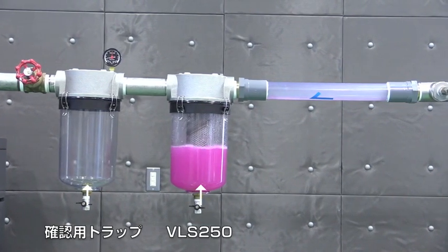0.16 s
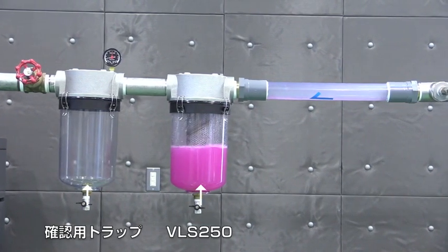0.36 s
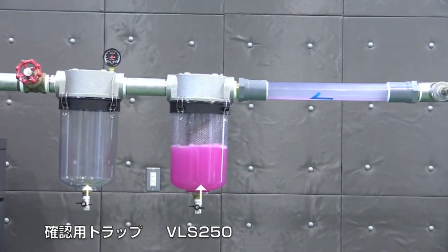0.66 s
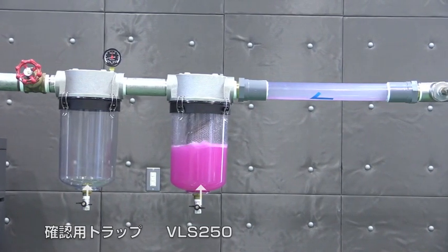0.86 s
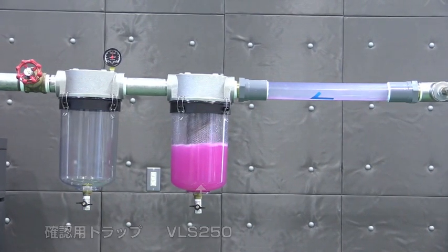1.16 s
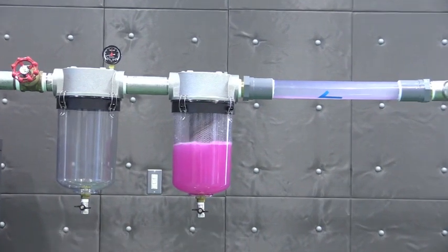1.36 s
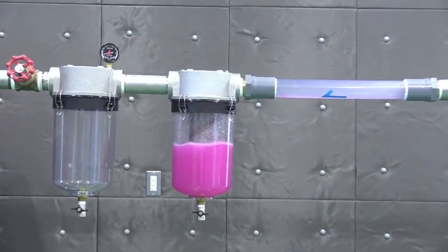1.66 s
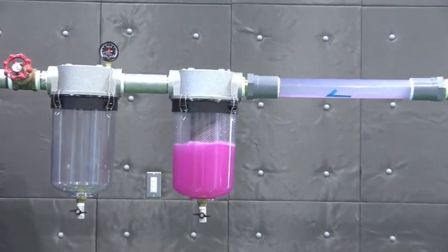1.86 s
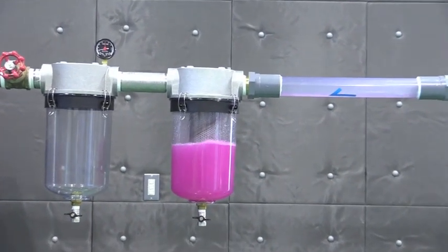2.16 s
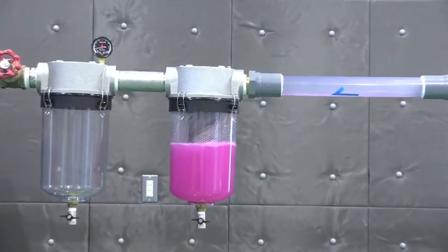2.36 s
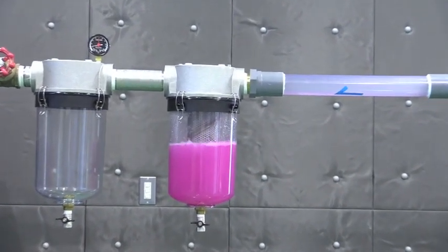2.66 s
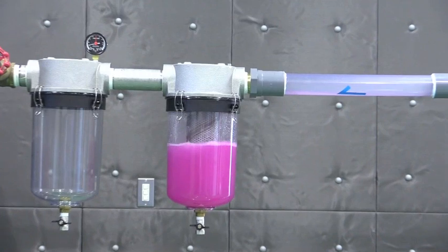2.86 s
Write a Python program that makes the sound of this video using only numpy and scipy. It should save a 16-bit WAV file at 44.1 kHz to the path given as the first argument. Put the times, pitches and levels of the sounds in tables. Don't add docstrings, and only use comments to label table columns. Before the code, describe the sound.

Two vacuum pumps drone throughout, a deep hum strongest near 117 and 234 Hz, beating very slowly over rumbling casings. Air rushes steadily through pipes with a mid-high hiss and faint fitting whistles. A thin valve whistle near 2.3 kHz swells around 0.15, 0.9 and, loudest, 2.15 seconds, rising again near 2.9. At about 1.33 seconds everything quickly fades to silence and back. Close stereo, dry padded room.

```python
import sys
import numpy as np
from scipy import signal
from scipy.io import wavfile
from scipy.ndimage import uniform_filter1d

SR = 44100
rng = np.random.default_rng(int(sys.argv[2]) if len(sys.argv) > 2 else 0)


def log_audio(samples):
    frames = np.atleast_2d(samples).T
    limited = np.clip(frames, -1, 1)
    pcm = np.round(limited * 32767).astype(np.int16)
    wavfile.write(sys.argv[1], SR, pcm)


def amplitude_ratio(level_db):
    exponent = np.asarray(level_db, float) / 20
    return 10 ** exponent


N = 133182
CUT_S = 1.328
SIDES = np.array([[.5], [-.5]])


def evened(x):
    return x / np.sqrt(np.mean(abs(x) ** 2) + 1e-20)


def read(points, hz):
    f, value = np.transpose(points)
    return np.interp(np.log(hz + 1), np.log(f + 1), value)


def drift(rate_hz):
    t = np.arange(N // 64 + 2) * 64 / SR
    rates_hz = np.geomspace(.3, 1, 16) * rate_hz
    slow = sum(np.sin(2 * np.pi * (f * t + rng.random())) / np.sqrt(f) for f in rates_hz)
    return np.interp(np.arange(N) / SR, t, evened(slow))


def fuzzy(hz, width_hz):
    pole = np.exp(-np.pi * width_hz * 32 / SR)
    a, b = rng.standard_normal((2, N // 32 + 400))
    slow = signal.lfilter([1], np.convolve([1, -pole], [1, -pole]), a + 1j * b)
    slow = evened(slow[300:])
    smooth = uniform_filter1d(np.repeat(slow, 32), size=32)[:N]
    carrier = np.exp(2j * np.pi * hz * np.arange(N) / SR)
    return np.sqrt(2) * (smooth * carrier).real


def ports(db, pan_db):
    return amplitude_ratio(db + SIDES * pan_db)


# f/Hz, lead/rad
PORT_LEAD = [(120, 0.23), (300, 0.11), (950, 0.34), (1900, 0.68), (3100, 0.54), (4800, -1.36), (6200, 0.08),
             (12000, -0.39)]


def pump(shaft_hz, orders, levels, pipe_leads):
    t = np.arange(N) / SR
    skipped_s = .62 * (t > CUT_S)
    turns = shaft_hz * (t + skipped_s) + .002 * drift(rate_hz=2.955)
    out = np.zeros((2, N))
    for order, (db, pan_db), lead in zip(orders, levels, np.resize(pipe_leads, len(orders))):
        port_phase = SIDES * read(PORT_LEAD, order * shaft_hz)
        wobble = amplitude_ratio(.4 * drift(rate_hz=5.2))
        out += ports(db, pan_db) * wobble * np.cos(2 * np.pi * (order * turns + lead) + port_phase)
    return np.sqrt(2) * out


FIRST_ORDERS = [2, 4, 6, 8, 10, 12, 14, 24, 26, 60, 83, 110, 112]
# level/dB, L-R/dB
FIRST_LEVELS = [(-26.8, 1.5), (-22, 2.3), (-34.5, -1.5), (-56, 0), (-51, -12), (-45, -3), (-53, -3),
                (-58, 0), (-57, 0), (-56, 0), (-59, 0), (-63, 4), (-68, 0)]
FIRST_PIPE_LEAD = [.38, .24, -.48]


def first_pump():
    return pump(58.39, FIRST_ORDERS, FIRST_LEVELS, FIRST_PIPE_LEAD)


SECOND_ORDERS = [2, 4, 6, 8, 10, 12, 14, 46, 49, 50, 52, 53, 55, 104]
# level/dB, L-R/dB
SECOND_LEVELS = [(-28.3, 2), (-22, 2.7), (-30, 6), (-36.5, 2), (-50, 5), (-55, -9), (-52, 2), (-58, 3),
                 (-60, 3), (-57, 3), (-53, 0), (-54, 6), (-50, 7), (-64, 0)]
SECOND_PIPE_LEAD = [-.34, .09, .04]


def second_pump():
    return pump(58.47, SECOND_ORDERS, SECOND_LEVELS, SECOND_PIPE_LEAD)


# f/Hz, likeness/0-1
SAME = [(50, 0.98), (330, 0.98), (1550, 0.4), (2300, 1), (3000, 0.43), (3700, 0.73), (5800, 0.39),
        (14500, 0.67)]
# f/Hz, L-R/dB
BALANCE = [(60, 0), (300, -0.5), (680, 0), (1750, 3.5), (2500, -.5), (3200, 1.5), (8800, -1.5), (14000, -1)]


def airy(shape, resonances, level_db):
    frames, hz = N // 1024 + 5, np.fft.rfftfreq(4096, 1 / SR)
    ragged = evened(uniform_filter1d(rng.standard_normal((3, 2049)), size=2))
    colour_db = read(shape, hz) - 60 * ((hz < 20) | (hz > 15700))
    colour_db = colour_db - 9.5 * np.maximum(hz - 14450, 0) / 1000
    for f, width_hz, lift_db in resonances:
        colour_db = colour_db + lift_db / (1 + (2 * (hz - f) / width_hz) ** 2)
    ragged_db = 2.5 * ragged[0] - 0.5 * ragged[1:]
    colour_db = colour_db + np.clip(hz / 5000, .15, 1) * ragged_db + SIDES * read(BALANCE, hz)

    a, b, c, d = rng.standard_normal((frames, 2049, 4)).T
    same = np.clip(read(SAME, hz), 0, 1)[:, None]
    left = a + 1j * b
    right = same * left + np.sqrt(1 - same ** 2) * (c + 1j * d)
    right = right * np.exp(-1j * read(PORT_LEAD, hz))[:, None]
    z = np.array([left, right]) * amplitude_ratio(colour_db[:, :, None])
    noise = signal.istft(z, nperseg=4096, noverlap=3072)[1][:, :N]
    return amplitude_ratio(level_db) * evened(noise)


# f/Hz, level/dB per Hz
RUMBLE = [(28, -54), (62, -22), (76, -9), (150, -3.5), (290, -2), (430, -11.5), (1400, -22.5), (5000, -109)]
# f/Hz, width/Hz, lift/dB
CASING = [(95, 35, -6), (300, 9.1, 5), (304, 16, -4), (370, 11, 5.5), (462, 14, 1.5), (584, 120, -3),
          (658, 80, 7.5), (744, 26, -11.5), (1213, 24, -5.5)]


def casing_rumble():
    return airy(RUMBLE, CASING, level_db=-22)


# f/Hz, level/dB per Hz
RUSH = [(500, -20.5), (1500, -7), (2200, -1), (3300, -8.5), (5500, -18), (9000, -21), (12000, -26.5),
        (14400, -30.5)]
# f/Hz, width/Hz, lift/dB
PIPES = [(2390, 80, 4), (2575, 100, 6), (2655, 30, -6), (2715, 80, 4), (3350, 200, -2), (3750, 280, 6),
         (3960, 60, -4), (4450, 250, 3), (4900, 250, 4), (7950, 200, 5), (8250, 300, -3), (9120, 200, 4),
         (10800, 150, 3), (11500, 400, 2)]


def air_rush():
    rattle = 1 + 0.04 * fuzzy(94.6, width_hz=5.6)
    swell = amplitude_ratio(-0.93 * drift(rate_hz=12))
    return rattle * swell * airy(RUSH, PIPES, level_db=-31)


WHISTLE_HZ = [2396, 2571, 2689, 3098, 3737, 4846, 5681, 7935, 8576, 8705, 9045, 9166, 11133, 11560]
# width/Hz, level/dB, L-R/dB
WHISTLES = [(25, -61, 0), (25, -51.5, -9), (12, -61, 4), (5.4, -63, 2), (7.4, -58, -6), (9.6, -57.5, -1),
            (4.4, -60, 4), (20, -63, -11), (12, -64, -5), (15, -65, -4), (12, -69, -5), (14, -60, -7),
            (20, -71, 0), (20, -72, 0)]


def fitting_whistles():
    out = np.zeros((2, N))
    for hz, (width_hz, db, pan_db) in zip(WHISTLE_HZ, WHISTLES):
        out += ports(db, pan_db) * fuzzy(hz, width_hz)
    return out


# t/s, level/dB
VALVE = [
    (0, -54),
    (.15, -37),
    (.5, -57),
    (.9, -33.5),
    (1.15, -40),
    (1.7, -45),
    (2.15, -27.5),
    (2.5, -45.5),
    (2.9, -30.5),
]


def valve_whistle():
    t, hz = np.arange(N) / SR, 2309
    turns = hz * t + .1 * drift(rate_hz=5.3)
    tone = 0.55 * np.sqrt(2) * np.cos(2 * np.pi * turns) + .3 * fuzzy(hz, width_hz=5)
    swell = amplitude_ratio(np.interp(t, *np.transpose(VALVE)))
    return ports(0, -1) * swell * tone


def scene():
    hum = first_pump() + second_pump()
    air = air_rush() + fitting_whistles() + valve_whistle()
    return hum + casing_rumble() + air


def roll_off(x):
    return signal.sosfilt(signal.butter(12, 15600, fs=SR, output="sos"), x)


def record(dry):
    fade_out_s, fade_in_s = .102, .094
    t = np.arange(N) / SR - CUT_S
    fade = np.clip(np.maximum(-t / fade_out_s, t / fade_in_s), 0, 1)
    return roll_off(dry * fade)


dry = scene()
out = record(dry)
log_audio(out)
```